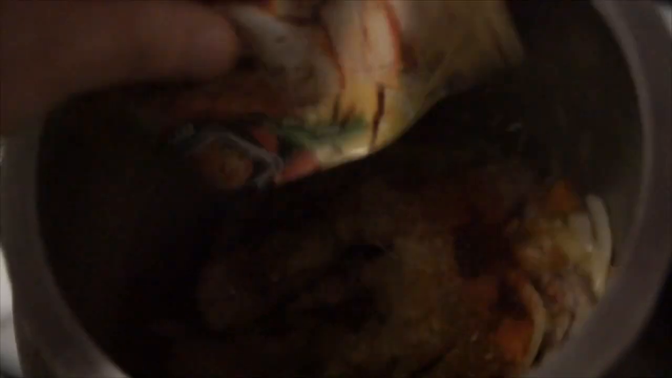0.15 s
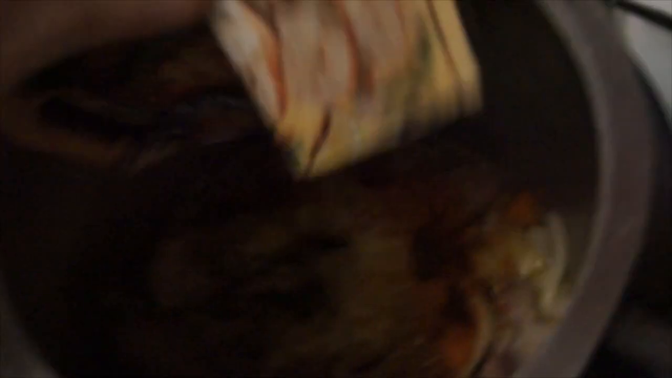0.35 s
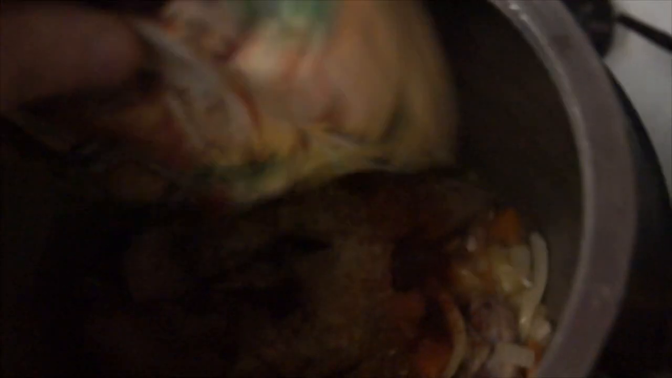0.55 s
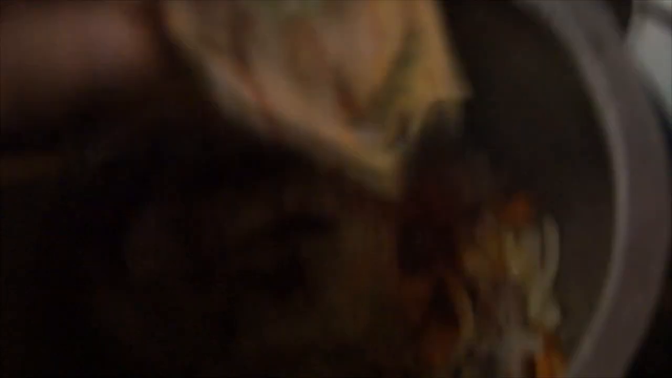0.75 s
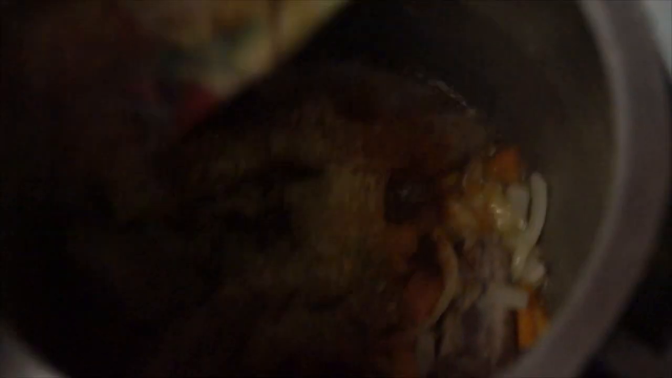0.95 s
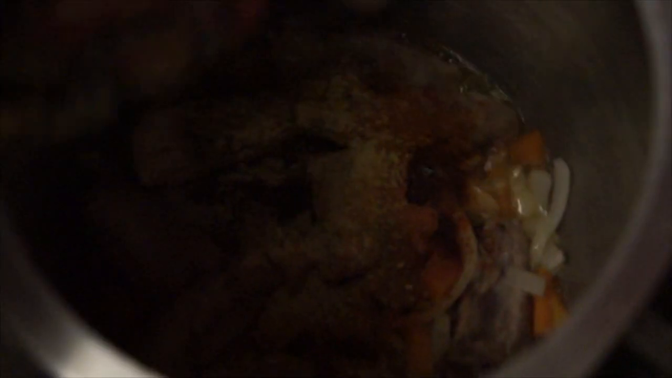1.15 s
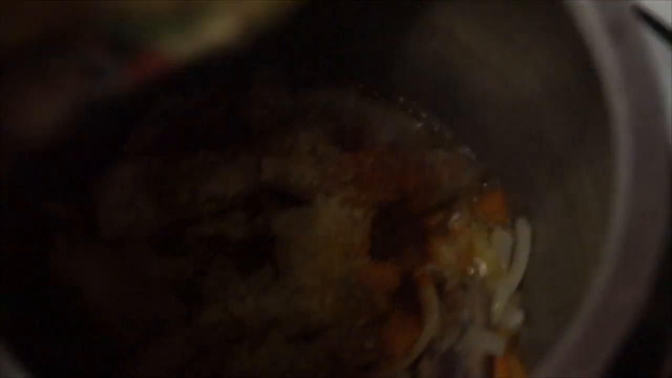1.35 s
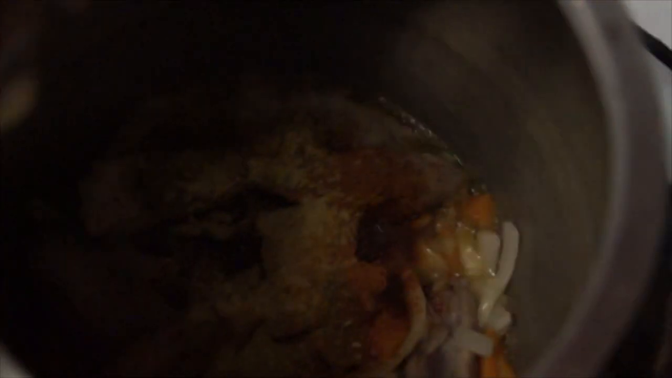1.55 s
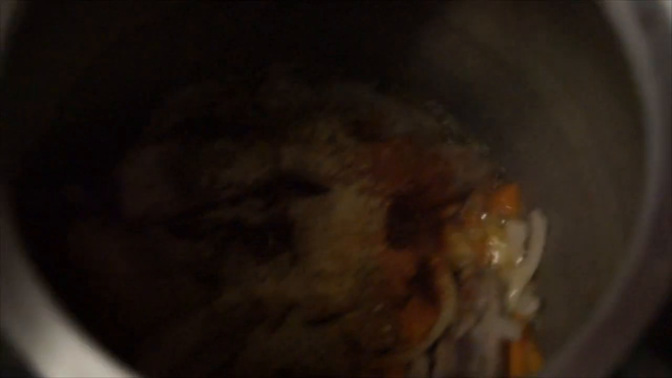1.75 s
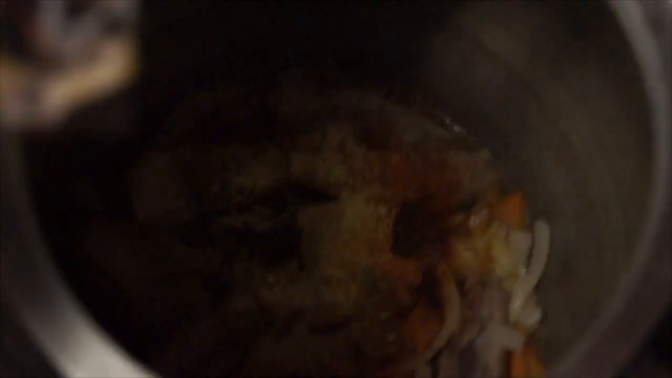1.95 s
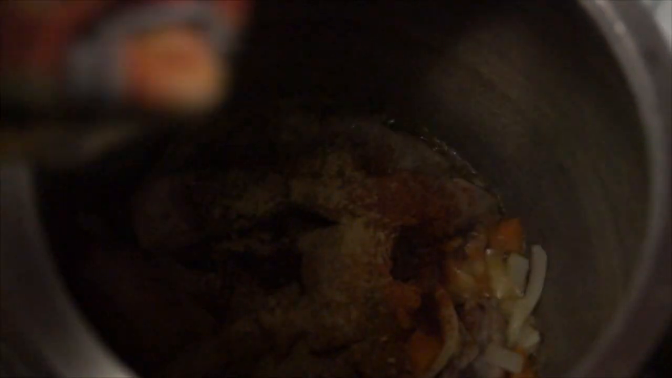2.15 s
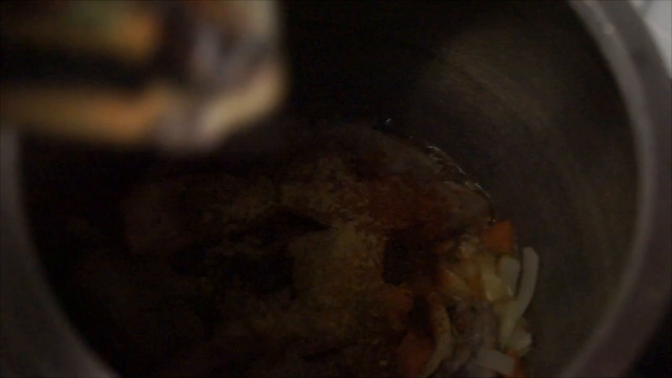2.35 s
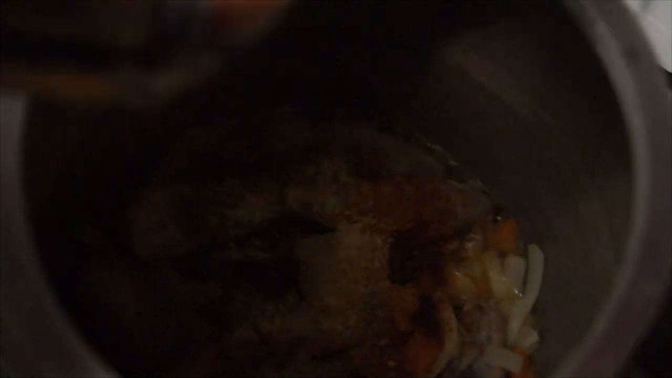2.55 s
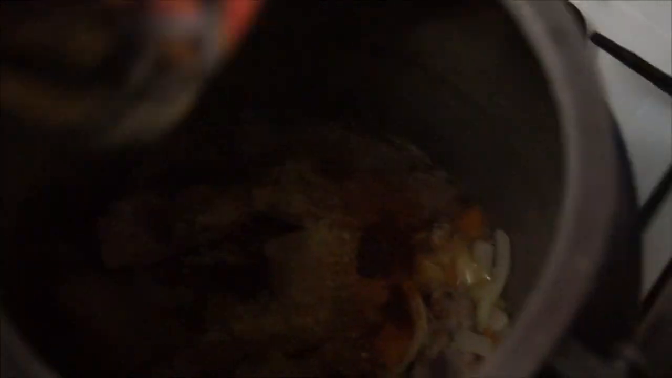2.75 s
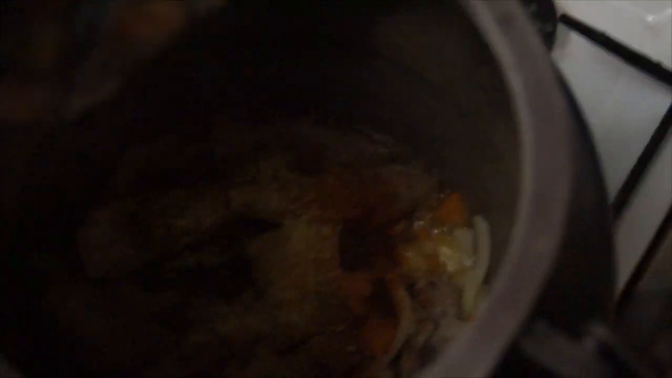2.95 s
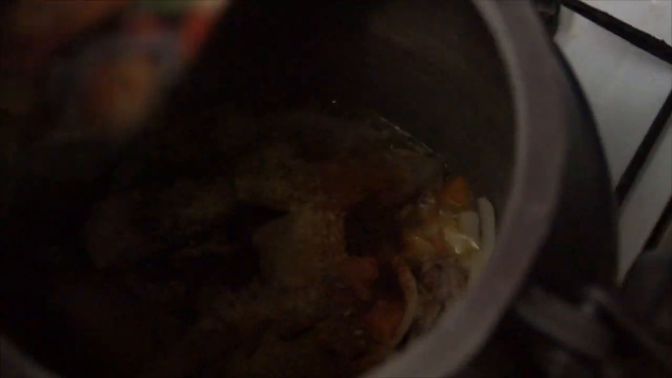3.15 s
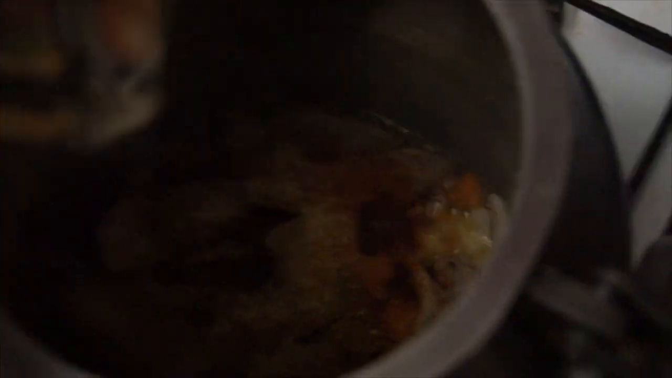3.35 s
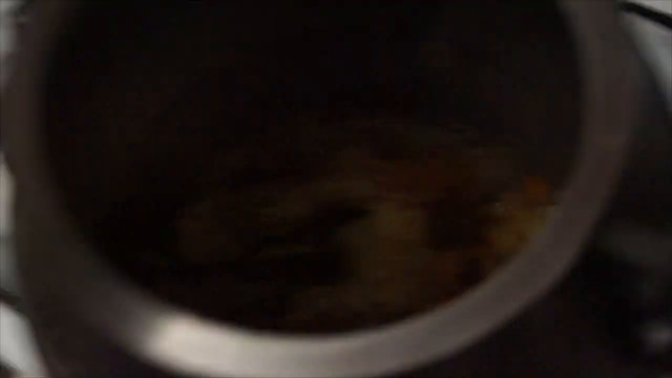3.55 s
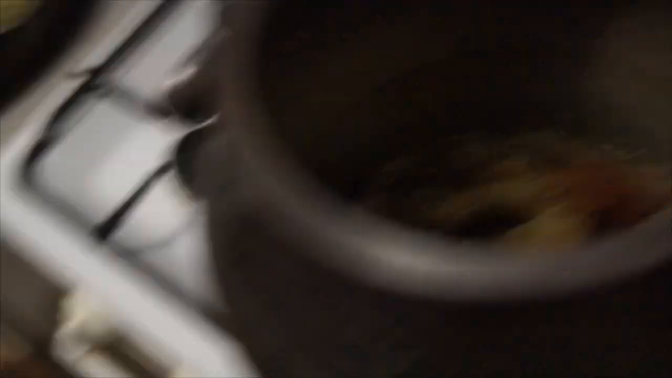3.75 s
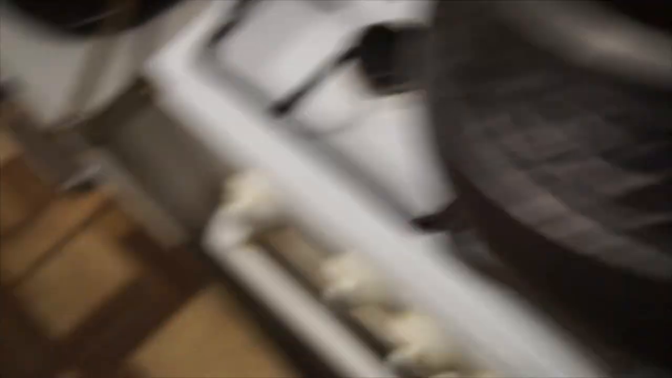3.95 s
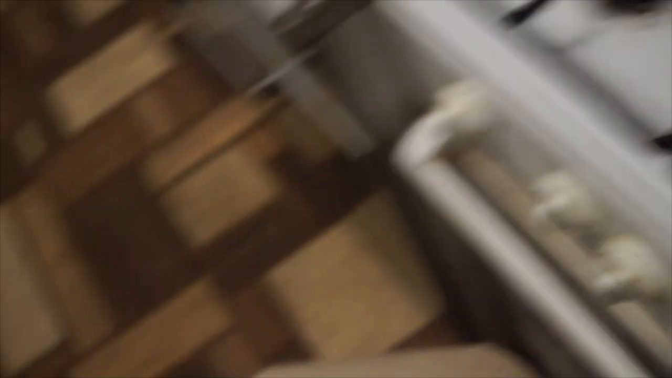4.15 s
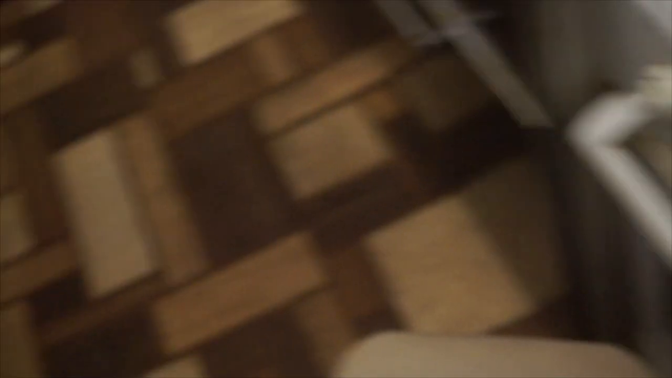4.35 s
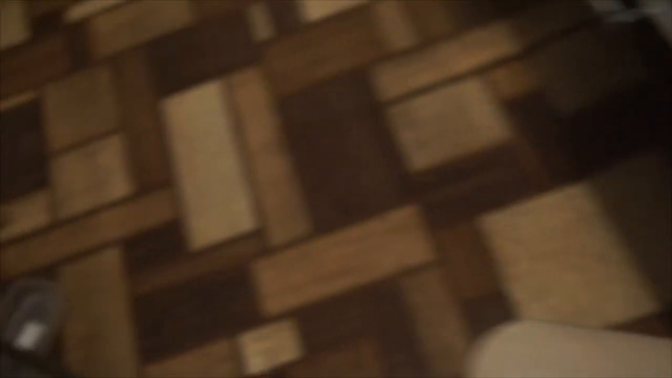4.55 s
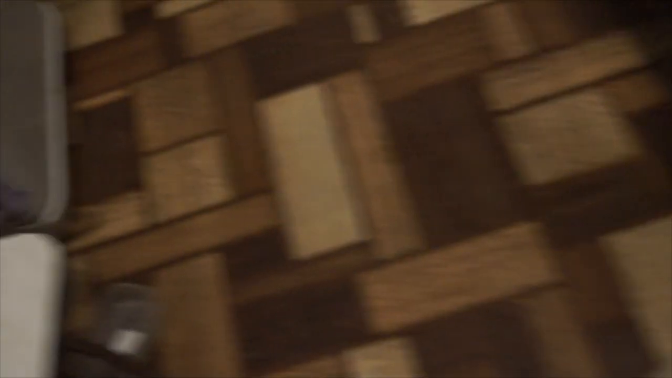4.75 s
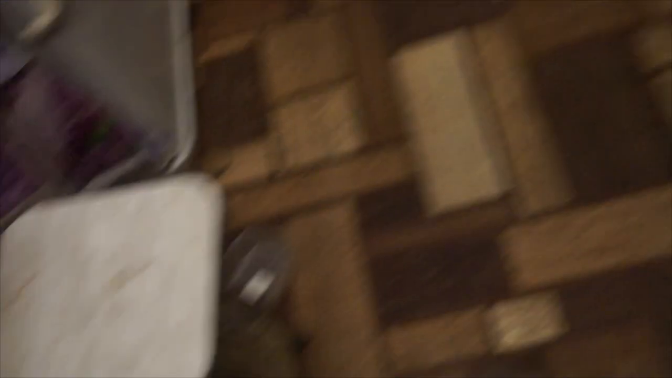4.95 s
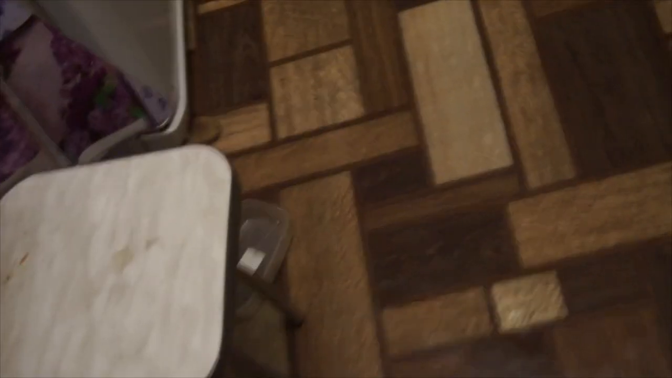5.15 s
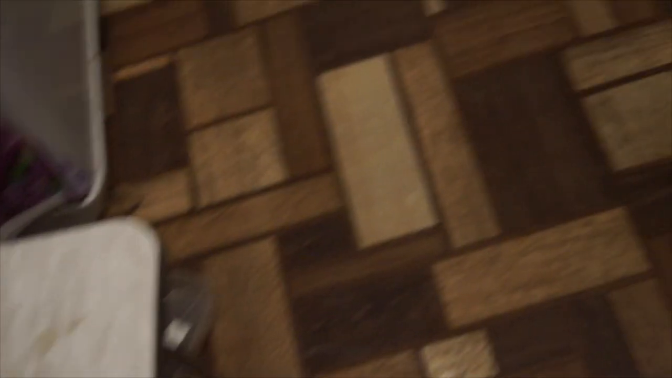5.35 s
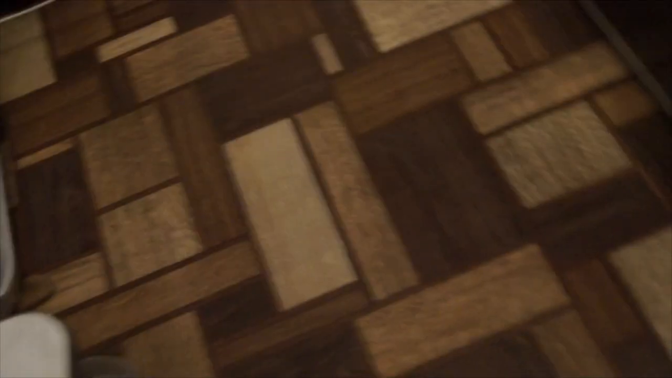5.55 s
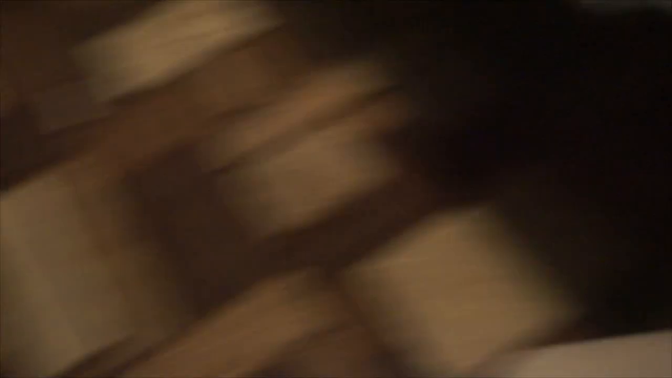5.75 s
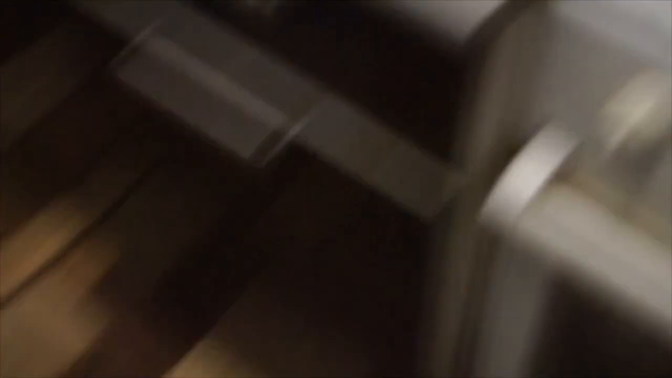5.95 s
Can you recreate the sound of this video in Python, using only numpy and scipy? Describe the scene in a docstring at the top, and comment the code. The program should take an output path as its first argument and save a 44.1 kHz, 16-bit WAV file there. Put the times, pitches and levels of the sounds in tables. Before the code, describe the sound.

In a small kitchen, food fries gently in a pot while a thin plastic packet crackles and snaps in uneven bursts right by a handheld stereo microphone. The crinkling stops a little past halfway. One last small crinkle and two dull, soft knocks come as the microphone moves away, leaving the slightly weaker fizz of oil, the low drone of the pot and a faint hum.

```python
"""A plastic seasoning packet snaps and crackles, shaken and squeezed close to a small stereo camera.
Each buckling facet of the film gives a tick, a short ring and a rattle. Underneath, oil sizzles in a pot,
the air in the pot drones and a faint hum wavers. About four seconds in, the packet falls quiet and the
camera is carried off across the kitchen with two soft knocks. Its housing stamps the same peaks and
notches on every sound."""
import sys
import numpy as np
from scipy import signal
from scipy.fft import rfft, irfft, next_fast_len
from scipy.io import wavfile
from scipy.ndimage import map_coordinates

SR = 44100
rng = np.random.default_rng(int(sys.argv[2]) if len(sys.argv) > 2 else 0)


def materialize(psi):
    """Save the field psi as 16-bit PCM at rate SR to the path in sys.argv[1].

    A 1-D psi becomes a single channel; in a 2-D psi each row is a channel.
    """
    bounded = np.clip(np.atleast_2d(psi).T, -1, 1)
    quanta = np.round(bounded * 32767).astype(np.int16)
    wavfile.write(sys.argv[1], SR, quanta)


N = 264159
TIME = np.arange(N) / SR


def amp(db):
    """Gain of a dB value."""
    return 10 ** (np.asarray(db) / 20)


def unit(x):
    """x at rms 1."""
    return x / np.sqrt(np.mean(x ** 2) + 1e-20)


def along(points, hz):
    """Read (Hz, value) points on a log frequency axis."""
    freqs, values = np.transpose(points)
    return np.interp(np.log(hz + 1), np.log(freqs + 1), values)


def curves(rows):
    """One value per sample for each column after the time."""
    times, *columns = np.transpose(rows)
    return [np.interp(TIME, times, column) for column in columns]


def wobble(rate):
    """A smooth random curve, rate knots a second."""
    return map_coordinates(rng.standard_normal(int(N * rate / SR) + 4), [TIME * rate])


def filtered(x, response):
    """x times a complex response of frequency."""
    size = next_fast_len(N + SR // 2)
    return irfft(rfft(x, size) * response(np.fft.rfftfreq(size, 1 / SR)), size)[..., :N]


# How alike the two microphone ports hear the room. Each row: frequency in Hz, left-right correlation.
PORT_LIKENESS = [(60, 0.6), (130, 0.75), (300, 1), (640, 0.91), (1400, 0.79), (3000, 0.55), (7000, 0.096),
                 (15000, 0.12)]

def stereo_noise(spectrum=((1, 0), (2, 0))):
    """Noise of rms 1 shaped by (Hz, dB) points: alike at both ports in the bass, unrelated in the treble."""
    def shape(hz):
        angle = np.arccos(along(PORT_LIKENESS, hz)) / 2
        return amp(along(spectrum, hz)) * [np.cos(angle), np.sin(angle)]
    mid, side = filtered(rng.standard_normal((2, N)), shape)
    return unit(np.array([mid + side, mid - side]))


# The kitchen around the microphones. Each row: frequency in Hz, time to fall 60 dB in seconds.
KITCHEN_DECAY = [(300, 0.14), (2000, 0.23), (10000, 0.085)]

def kitchen_echo(x):
    """Each frequency of the room's answer dies at its own speed."""
    hz, t, spectra = signal.stft(stereo_noise()[:, :SR // 3], SR, nperseg=256)
    decay = amp(-60 * t / along(KITCHEN_DECAY, hz)[:, None])
    tail = signal.istft(spectra * decay, SR, nperseg=256)[1]
    delayed = np.pad(x.mean(axis=0), (130, 0))[None]
    return signal.fftconvolve(delayed, tail / np.linalg.norm(tail[0]), axes=1)[:, :N]


def hum(centre_hz=1040, width_hz=29, level_db=-52.5):
    """A faint wavering hum: noise in one narrow resonance."""
    resonance = lambda f: 1j * f * width_hz / (centre_hz ** 2 - f * f + 1j * f * width_hz)
    return amp(level_db + 1.4 * wobble(5)) * unit(filtered(stereo_noise(), resonance))


# Soft knocks as the camera is carried off.
# Each row: start in seconds, level in dB, time to fall 60 dB in seconds, top of the band in Hz.
CARRY_KNOCKS = [(4.056, -29.5, 0.12, 2600), (4.407, -30, 0.035, 1200)]

def knocks(attack_s=0.003):
    """Dull puffs with a soft start and no ring."""
    out = np.zeros((2, N))
    for start, db, t60, top_hz in CARRY_KNOCKS:
        age = (TIME - start).clip(0)
        envelope = amp(db - 60 * age / t60) * (1 - np.exp(-age / attack_s))
        out += envelope * stereo_noise([(250, -32), (450, -1), (top_hz, -1.5), (1.5 * top_hz, -26)])
    return out


# The film's parts, by the bands they sound in: large panels, middle panels, low facets, small facets,
# whole bag, high facets. The oil's spits use these bands too.
# Each row: low edge in Hz, high edge in Hz, gain of the rattle in dB, its base 60 dB decay in seconds.
CLICK_BANDS = [(560, 1520, 2.5, 0.065), (1414, 2660, 5, 0.039), (2180, 3940, -5.5, 0.063),
               (6100, 12500, 4, 0.04), (282, 450, 3.5, 0.092), (3560, 7350, -4.5, 0.07)]
FACET_HZ = 4160  # ring of a usual facet

def clicks(times, band_db, ring_hz, pan_db, tick, ring, length):
    """Each click is a tick and a dying rattle in every band, plus a short ring; length scales the decays."""
    out = np.zeros((2, N))
    onsets = (times * SR).astype(int)
    sides = amp(np.array([pan_db, -pan_db]) / 2)
    t = np.arange(int(SR * .06)) / SR
    place = lambda rows: np.bincount((onsets[:, None] + np.arange(len(t))).ravel(), rows.ravel(), N)[:N]
    # a longer rattle starts with a weaker tick and builds up more slowly
    sharpness = amp(-7 * (length - 0.49))
    length = length[:, None]
    build = 1 - np.exp(-t / (0.003 * length ** 2 + 1e-5))
    for (low_hz, high_hz, rattle_db, t60), level_db in zip(CLICK_BANDS, band_db):
        gains = amp(level_db) * sides
        power = amp(2 * rattle_db - 120 * t / (t60 * length)) * build
        envelope = np.sqrt([place(gain[:, None] ** 2 * power) for gain in gains])
        lumps = unit(amp(2.5 * wobble(350)))
        rattle = envelope * lumps * stereo_noise()
        impulses = np.array([np.bincount(onsets, gain * sharpness, N) for gain in gains])
        band = signal.butter(2, [low_hz, high_hz], "band", fs=SR, output="sos")
        boost = np.sqrt(SR / 2 / (high_hz - low_hz))  # narrow bands need a larger push
        out += boost * signal.sosfilt(band, rattle + tick * impulses)
    ring_envelope = amp(-60 * t / (0.0078 * length)) * (1 - np.exp(-t / 0.000072))
    tone = ring * np.sin(2 * np.pi * ring_hz[:, None] * t) * ring_envelope
    return out + [place(gain[:, None] * tone) for gain in amp(band_db[5]) * sides * sharpness]


def swarm(level_db, per_second, tick, ring, length, tilt_db, spread_db=5, colour_db=5):
    """Random clicks, many small and few large, each with its own colour, pitch and pan."""
    when, rank = rng.random((int(per_second * N / SR), 2)).T
    chance = rng.standard_normal((len(when), 8)).T
    onsets = (when * N).astype(int)
    size_db = level_db[onsets] - spread_db * np.log(rank + .15)
    band_db = size_db + colour_db * np.tanh(chance[:6]) + np.array(tilt_db)[:, None]
    pan_db = 3 * chance[6]
    ring_hz = FACET_HZ * np.exp(0.247 * chance[7])
    return clicks(onsets / SR, band_db, ring_hz, pan_db, tick, ring, np.full(len(onsets), length))


# The pot and the hand as heard at the camera, close to the stove at first, then farther off.
# Each row: time in seconds, base level of the sizzle in dB, base level of the hand rumble in dB.
SIZZLE_AND_HAND = [(0, -34.5, -81), (.9, -38, -64), (2.7, -35.5, -64), (3.5, -37, -75), (4.3, -39, -76),
                   (4.7, -39.5, -79), (5.1, -40, -82), (5.5, -41, -87), (5.99, -40, -85)]

def handling():
    """The hand on the camera rumbles in short lumps."""
    level_db = curves(SIZZLE_AND_HAND)[1] - 3
    lumps = amp(level_db + 5.5 * wobble(16) + 3.3 * np.array([wobble(16), wobble(14)]))
    return lumps * stereo_noise([(20, -9), (40, -7), (100, -6.5), (200, -4), (400, -33)])


# The frying oil, and the air in the pot. Each row: frequency in Hz, relative spectral level in dB.
OIL_SPECTRUM = [(60, -37), (200, -14), (500, 2.5), (1000, -3.5), (1500, 2), (1900, 6), (2300, 6.5),
                (4000, 2.5), (5200, 2), (7000, -2.5), (11000, -12), (16000, -29)]
POT_AIR_SPECTRUM = [(170, -49), (240, -20.5), (295, -3.5), (322, 7.5), (343, 1), (365, 6.5), (388, -2.5),
                    (450, -8.5), (560, -36), (700, -62)]
# The pot's drone from where the camera is. Each row: time in seconds, level in dB.
POT_AIR_LEVEL = [(0, -39), (.7, -36.5), (1.2, -40.5), (2, -40.5), (2.8, -40), (3.3, -42.5), (4.5, -43.5),
                 (5.99, -45.5)]

def pot():
    """Oil fizzes with small soft spits; the air in the pot drones."""
    drone_db, sizzle_db = curves(POT_AIR_LEVEL)[0], curves(SIZZLE_AND_HAND)[0]
    fizz = amp(sizzle_db + 0.79 * wobble(3.866) + 1.5 * wobble(11)) * stereo_noise(OIL_SPECTRUM)
    spits = swarm(sizzle_db - 15, per_second=90, tick=.8, ring=.8, length=1.2,
                  tilt_db=[-15, -10, -1.5, -12, -30, -1.5])
    drone = amp(drone_db + 1.8 * wobble(7)) * stereo_noise(POT_AIR_SPECTRUM)
    return fizz + spits + drone


# Squeezes of the bag over the pot.
# Each row: moment of full grip in seconds, relative crackle level in dB, hold in seconds.
BAG_SQUEEZES = [(0, -26.5, 0.016), (0.179, -31.5, 0.027), (0.354, -23.5, 0.02), (0.46, -28.5, 0.019),
                (0.579, -29, 0.062), (0.784, -26, 0.08), (0.893, -30, 0.064), (1.034, -26, 0.0073),
                (1.128, -31.5, 0.2), (1.398, -26.5, 0.029), (1.561, -26, 0.026), (1.701, -30, 0.068),
                (1.888, -24, 0.02), (2.103, -29, 0.019), (2.302, -26, 0.033), (2.511, -27.5, 0.0074),
                (2.636, -27.5, 0.011), (2.762, -24, 0.018), (2.872, -25, 0.02), (2.993, -28.5, 0.085),
                (3.197, -27, 0.043), (3.365, -27, 0.08), (3.49, -38, 0.12), (4.07, -36, 0.03)]

def crackle(grip_db_per_s=324, relax_db_per_s=219):
    """The film crackles under each squeeze: a fast swell, a hold, a slower release. Overlaps add up."""
    power = np.zeros(N)
    for grip, db, hold in BAG_SQUEEZES:
        before, after = (grip - TIME).clip(0), (TIME - grip - hold).clip(0)
        power += amp(db - grip_db_per_s * before - relax_db_per_s * after) ** 2
    level_db = 10 * np.log10(power + 1e-14) - 11.5
    return swarm(level_db, per_second=260, tick=2, ring=1.47, length=0.69,
                 tilt_db=[-8.5, -3.5, 5, -6, -17.5, 6.5])


# Creases in the film that fold sharply. Each row: start in seconds, relative level in dB.
CREASE_TICKS = [(.0188, -20.5), (.852, -20), (1.1902, -14), (1.27, -16), (1.57, -14), (1.6021, -13.5),
                (1.7568, -22), (1.922, -15.5), (2.3197, -17), (2.3486, -16), (3.409, -13), (4.661, -33)]

def creases(snap_folds, t60=.004):
    """Each crease, alone or folded by a snap, gives a thin treble tick a few milliseconds long."""
    t = np.arange(int(SR * .02)) / SR
    out = np.zeros((2, N))
    for start, db in CREASE_TICKS + snap_folds:
        burst = rng.standard_normal((2, len(t))) * amp(-60 * t / t60)
        burst[[0, 1], [2, rng.integers(5)]] = 5.2  # a spike at each port, up to two samples apart
        onset = round(start * SR)
        out[:, onset:onset + len(t)] += amp(db) * burst
    return signal.sosfilt(signal.butter(2, [7500, 14500], "band", fs=SR, output="sos"), out)


# Single snaps of the film, close to the microphones. Each row: start in seconds, push in dB,
# large panels relative to the push in dB, rattle length as a factor, pitch of the facet in Hz.
FILM_SNAPS = [(0.0547, -19.0, -16, 0.82, 2950), (0.1445, -17.5, -9, 0.31, 2800),
              (0.1892, -18, -15, 0.48, 7500), (0.3327, -14.0, -10, 0.57, 8150),
              (0.3466, -19, -19, 0.4, 3040), (0.3579, -12.5, -39, 0.85, 3020),
              (0.3859, -22.0, -22, 0.66, 6000), (0.4366, -16.5, -20, 1.2, 4600),
              (0.491, -18.0, -11, 0.76, 4000), (0.5514, -26.5, -2.5, 0.66, 3820),
              (0.5694, -15.5, -16, 0.95, 5040), (0.6423, -19, -8.5, 1.3, 2750), (0.77, -24, -11, 1.1, 3700),
              (0.8015, -15.5, -20, 0.95, 7000), (0.877, -19.5, -13, 1.7, 3970),
              (0.902, -15.5, -12, 0.42, 3800), (0.957, -25.5, -17, 0.58, 4700),
              (1.0506, -15.0, -18.5, 1.2, 3840), (1.1259, -22.5, -10, 0.5, 4430),
              (1.1356, -17.5, -16, 0.41, 6700), (1.1462, -20, -15, 0.94, 6700),
              (1.1657, -17.5, -14, 1.5, 3900), (1.2265, -17.5, -36.0, 0.77, 4430),
              (1.266, -22, -30.0, 1.1, 4130), (1.2954, -24.0, -20.0, 0.65, 7550),
              (1.3318, -28, -24.0, 0.32, 4200), (1.3603, -15, -19, 0.86, 4130),
              (1.398, -16.5, -14, 1.3, 7160), (1.4435, -17.5, -34.0, 1.2, 3000),
              (1.516, -15.5, -18, 1.0, 4230), (1.5694, -25.5, -23.0, 1.6, 3000),
              (1.6843, -15.5, -12.5, 0.45, 4300), (1.7568, -22.5, -14, 0.74, 8600),
              (1.7725, -19.5, -17, 0.59, 4300), (1.8366, -24, -16, 0.88, 3800),
              (1.8788, -18.0, -12.5, 0.63, 4300), (1.8877, -15, -13, 0.84, 4140),
              (1.9234, -18, -18, 0.6, 4140), (1.9314, -15.0, -19, 1.0, 4900),
              (1.9863, -23, -16.0, 0.45, 2900), (2.0309, -15, -24, 0.32, 4570),
              (2.077, -26, -6, 0.63, 4300), (2.1458, -20.5, -14, 0.76, 4570),
              (2.1721, -20, -17, 0.36, 4100), (2.2698, -22.5, -13, 0.76, 6400),
              (2.2943, -22.5, 2.5, 0.49, 6200), (2.3055, -24.0, -5, 1, 4100),
              (2.3513, -22, -4.5, 0.49, 5130), (2.4004, -16.5, -8, 0.33, 7000),
              (2.4679, -22, -7, 0.55, 4270), (2.6279, -20.5, -9, 0.81, 5570),
              (2.6957, -20.5, -11, 0.47, 6660), (2.7444, -10, -12.5, 1, 4600),
              (2.7902, -23.5, -1.5, 0.5, 4070), (2.8408, -25.5, -6.0, 1, 4800),
              (2.8565, -20, -23, 1.2, 6000), (2.8683, -14, -30.0, 0.69, 7030),
              (2.8912, -20.5, -29.0, 0.45, 4500), (2.9651, -20, -12.5, 1.25, 3700),
              (3.0055, -22, -30.0, 0.42, 3200), (3.0142, -16, -32.0, 0.78, 4600),
              (3.038, -16.5, -15.5, 0.78, 5800), (3.0927, -22, -13.0, 0.45, 2800),
              (3.1415, -24, -10, 0.46, 6600), (3.1792, -22.5, -14, 0.73, 4120),
              (3.2238, -24.5, -6, 1, 5600), (3.3886, -14, -34.0, 1.06, 2830),
              (3.4541, -16.5, -12, 0.41, 4300), (3.6356, -22.5, -29.0, 0.84, 5270),
              (4.0567, -27, -8.5, 1, 4500)]

def packet():
    """Facets buckle with a snap that shakes the whole film and folds a crease, over the crackle."""
    starts, push_db, panel_db, length, ring_hz = np.transpose(FILM_SNAPS)
    _, pan, middle_scatter, fold_scatter = rng.standard_normal((len(starts), 4)).T
    large_db = push_db + panel_db
    # middle panels gain less than the push does, unless the large ones drag them along
    middle_db = np.maximum(-23 + 0.41 * push_db + 4 * middle_scatter, large_db - 3)
    lean_db = 2.5 * np.log2(ring_hz / FACET_HZ)  # a higher facet makes a brighter snap
    low_db, high_db = push_db - lean_db, push_db + lean_db
    small_db, bag_db = high_db - 15, large_db - 17
    band_db = np.array([large_db, middle_db, low_db, small_db, bag_db, high_db])
    snaps = clicks(starts, band_db, ring_hz, pan_db=1.5 * pan, tick=4.5, ring=2.1, length=length)
    folds = list(zip(starts, push_db - 10.5 + 5 * fold_scatter))
    return snaps + crackle() + creases(folds)


# The camera turns away from the pot.
# Each row: time in seconds, lag of the left port in milliseconds, gain of the left port in dB.
CAMERA_TURN = [(0, -0.037, 0.5), (3.7, -0.042, 0.37), (4.3, 0.13, -0.6), (5.99, 0.14, -0.8)]

def scene():
    """Packet, echo, pot, hum and knocks reach the left port early, then late; the hand rumbles on top."""
    film = packet()
    echo = amp(-12) * kitchen_echo(film)
    left, right = film + echo + pot() + hum() + knocks()
    lag_ms, left_db = curves(CAMERA_TURN)
    read_at = np.arange(N) - lag_ms * SR / 1000
    left = amp(left_db) * map_coordinates(left, [read_at], order=5, mode="nearest")
    return np.array([left, right]) + handling()


# Peaks and notches of the housing around the microphones. Each row: centre in Hz, width in Hz, gain in dB.
HOUSING_BELLS = [(611, 72, -12.5), (781, 172, 4), (1000, 79, 6.5), (1401, 70, -16.5), (1920, 300, 4),
                 (2400, 194, -22), (2750, 660, 6), (3473, 482, -9.5), (3984, 1410, 7.5)]
# The right port is shaded in the high treble. Each row: frequency in Hz, gain in dB.
RIGHT_PORT_SHADE = [(6000, 0), (9000, 2.5), (11000, -2.5), (13000, -11), (16000, -20)]

def record(dry):
    """The camera: housing resonances, a shaded right port, soft clipping and a band limit."""
    def housing(f):
        bells = [(hz * hz - f * f + 1j * f * width * amp(db / 2))
                 / (hz * hz - f * f + 1j * f * width / amp(db / 2)) for hz, width, db in HOUSING_BELLS]
        return np.prod(bells, axis=0) * amp([0 * f, along(RIGHT_PORT_SHADE, f)])
    coloured = filtered(dry, housing)
    clipped = coloured / (1 + np.abs(coloured) ** 8) ** (1 / 8)
    return filtered(clipped, lambda hz: hz < 16500)


dry = scene()
out = record(dry)
materialize(out)
```